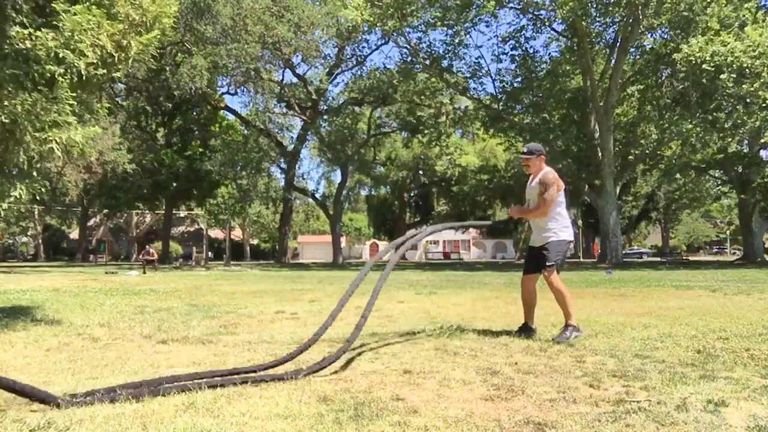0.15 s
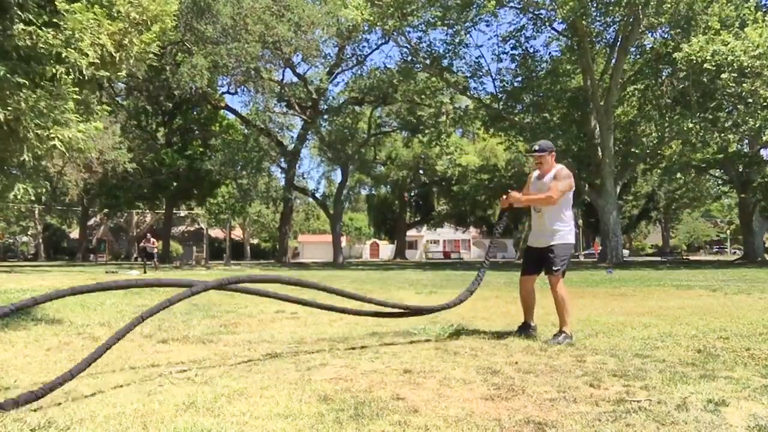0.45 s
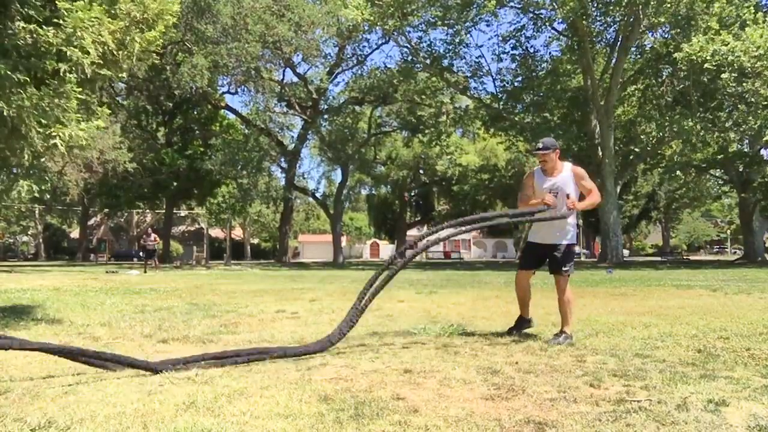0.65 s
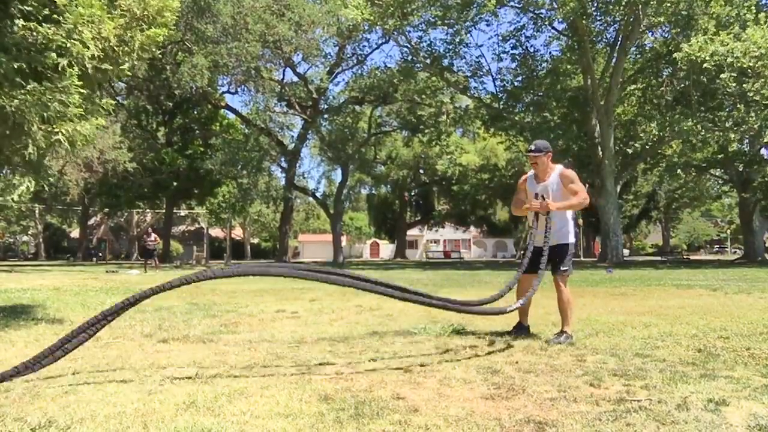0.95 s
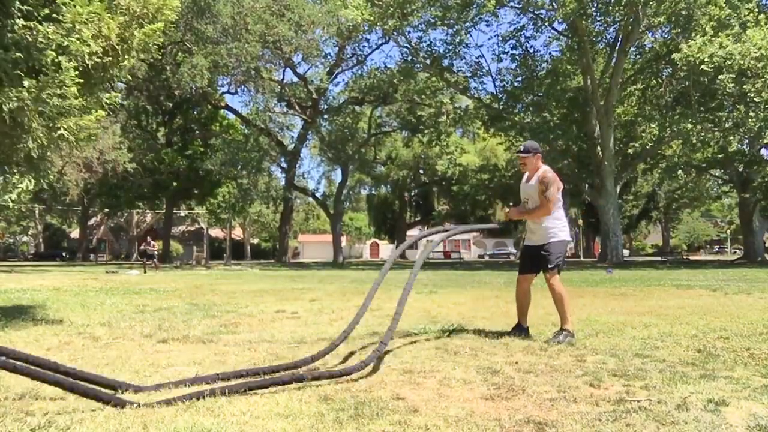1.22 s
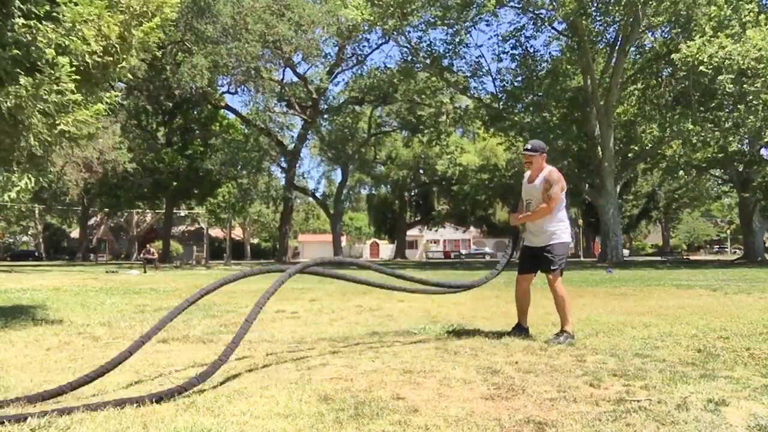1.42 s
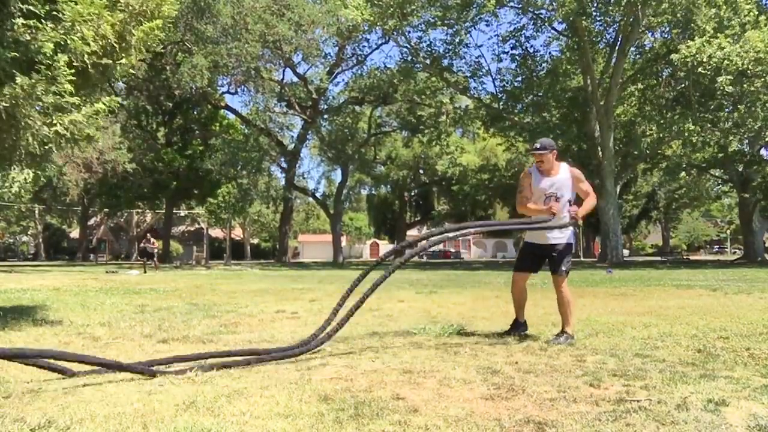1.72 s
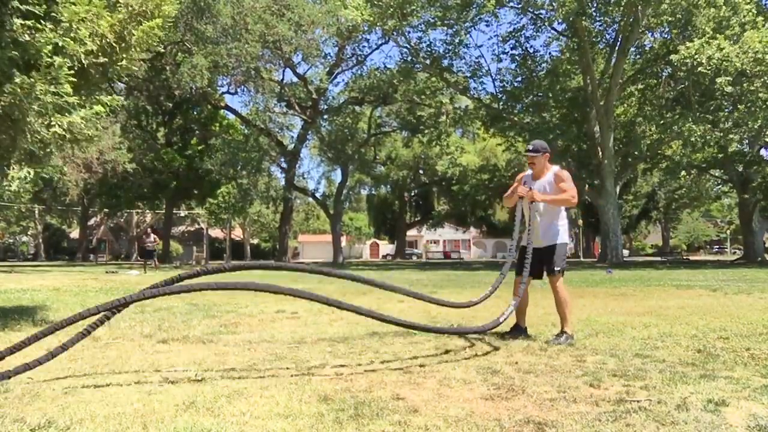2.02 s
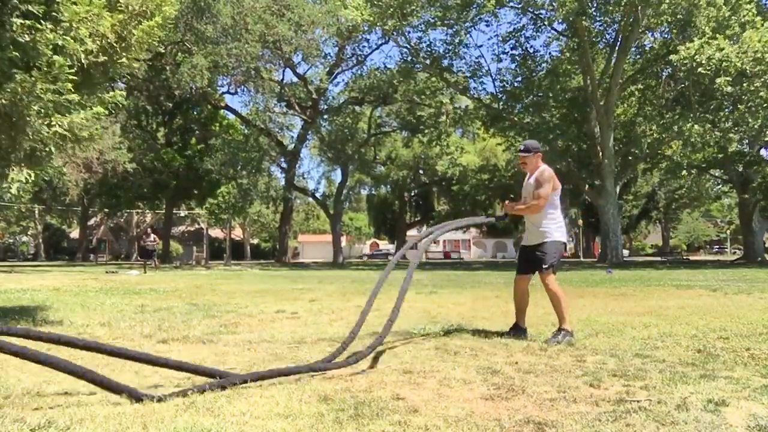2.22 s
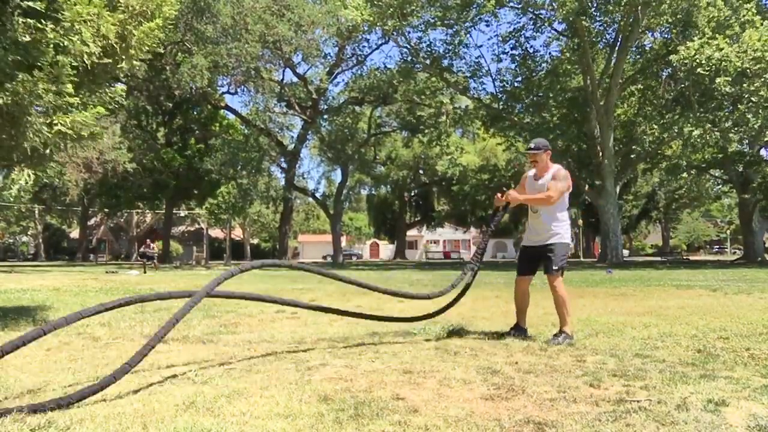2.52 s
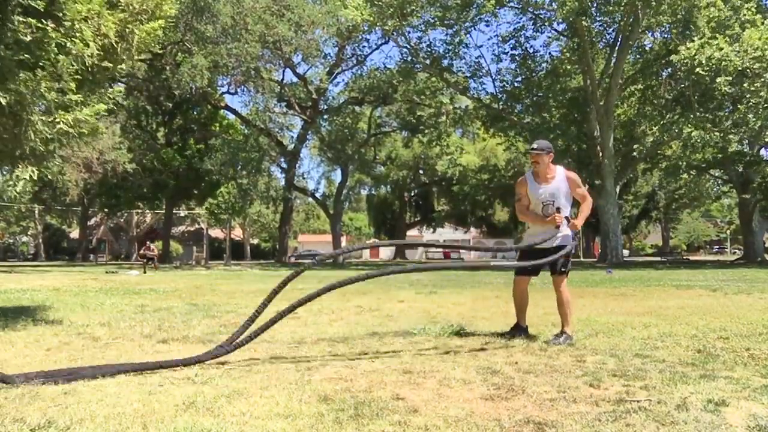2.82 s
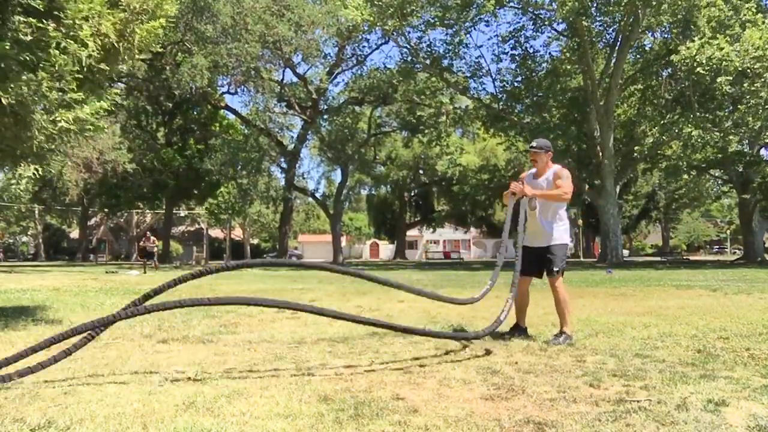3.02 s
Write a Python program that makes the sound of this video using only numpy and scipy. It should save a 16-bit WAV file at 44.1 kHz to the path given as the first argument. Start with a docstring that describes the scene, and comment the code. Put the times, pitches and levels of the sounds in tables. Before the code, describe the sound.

Battle ropes whipped in waves brush and thump on a park lawn amid gusty wind rumble

```python
"""A microphone stands by a dry lawn in a park, for about three seconds.
First come the park's steady hush (coloured noise), wind rumbling on the microphone (fluttering noise)
and faint distant birds (gliding tones). Two heavy exercise ropes, whipped in waves, swish through the
grass (crackling noise); eddies buffet the microphone (throbs under noise), most thickly from 0.5 to 1 s.
From 0.5 s the ropes slap the turf about twice a second (short cracks and thuds)."""
import sys
import numpy as np
from scipy import signal
from scipy.fft import rfft, irfft
from scipy.io import wavfile
from scipy.ndimage import uniform_filter1d

SR = 44100
rng = np.random.default_rng(int(sys.argv[2]) if len(sys.argv) > 2 else 0)


def int16_out(signal):
    """Quantize to a 16-bit WAV file."""
    q = np.round(np.clip(np.atleast_2d(signal).T, -1, 1) * 32767)
    wavfile.write(sys.argv[1], SR, q.astype(np.int16))


N = 138915
TIME = np.arange(N) / SR  # s
FREQS = np.maximum(np.arange(N + 1) * SR / (2 * N), 1)  # Hz, for a spectrum padded to twice the length


def from_db(db):
    """Decibels to amplitude gain."""
    return 10 ** (np.asarray(db) / 20)


def rms_one(x):
    """Scale to unit rms."""
    return x / np.sqrt(np.mean(x ** 2) + 1e-20)


def coloured(x, colour, tilt_db=0):
    """Shape a spectrum, tilted in dB per octave and falling away beyond both end points; rms 1."""
    hz, db = np.transpose(colour)
    gain = from_db(np.interp(np.log(FREQS), np.log(hz), db) + tilt_db * np.log2(FREQS))
    below = np.minimum(FREQS / hz[0], 1) ** 2
    above = np.minimum(hz[-1] / FREQS, 1) ** 2
    return rms_one(irfft(rfft(x, 2 * N) * gain * below * above)[:N])


def noise():
    """White noise."""
    return rng.standard_normal(N)


def drift(rate):
    """Random wander of spread about 1: straight lines between random values, at a rate per second."""
    knots = rng.standard_normal(1000)
    return np.interp(TIME * rate, np.arange(len(knots)), knots)


def evened(x, span_s):
    """Hold a noise at unit level over a short span."""
    power = uniform_filter1d(x ** 2, max(int(span_s * SR), 2))
    return x / np.sqrt(np.abs(power) + 1e-12)


def swell(s, rise_s, fall_s):
    """A rounded (Gaussian) rise and fall around a moment."""
    width_s = np.where(TIME < s, rise_s, fall_s)
    return np.exp(-.5 * ((TIME - s) / width_s) ** 2)


def blow(s, attack_s, decay_s):
    """A quick rise to a moment, then an exponential decay."""
    return np.exp(-np.where(TIME < s, ((TIME - s) / attack_s) ** 2, (TIME - s) / decay_s))


def crackle():
    """Dry blades snapping at random over a smooth rub."""
    snaps_per_s, spread_db, share = 5000, 6, 0.33  # share of the power that is snaps
    sizes = from_db(spread_db * np.minimum(rng.exponential(1, N), 5))
    signs = rng.choice([-1, 1], N)
    snaps = rms_one(sizes * signs * (rng.random(N) < snaps_per_s / SR))
    return np.sqrt(share) * snaps + np.sqrt(1 - share) * noise()


# spectrum of the park's hush: f/Hz, relative level/dB per Hz
PARK_SPECTRUM = [(60, 12), (200, -7), (450, -4.5), (800, -1.5), (1300, -2), (2000, -9.5), (3200, -14.5),
                 (4500, -18.5), (7500, -25), (9000, -25.5), (15500, -25)]
PARK_DB = -55.5


def park_hush():
    """The steady hush of the park behind everything: noise of fixed level and colour."""
    return from_db(PARK_DB) * coloured(noise(), PARK_SPECTRUM)


# strength of the breeze at the microphone: t/s, level/dB before trim and flutter
BREEZE = [(0, -47.5), (.07, -50), (.13, -44), (.46, -44), (.53, -38.5), (.57, -32), (0.622, -36),
          (.685, -42.5), (.705, -55), (.745, -42), (.775, -37.5), (.9, -34), (.99, -35.5), (1.12, -45),
          (1.2, -35), (1.245, -56), (1.3, -41), (1.37, -51.5), (1.42, -41), (1.56, -47.5), (1.68, -45),
          (1.92, -43.5), (2.04, -50.5), (2.12, -41.5), (2.21, -47), (2.38, -42), (2.56, -45), (2.66, -42),
          (2.86, -42), (3.15, -45.5)]
# spectrum of the wind rumble: f/Hz, relative level/dB per Hz
RUMBLE_SPECTRUM = [(22, -14), (35, -17.5), (55, 1.5), (80, 7), (125, 1.5), (185, -2.5), (260, -12),
                   (400, -27), (700, -36)]
WIND_TRIM_DB, WIND_FLUTTER_DB, WIND_FLUTTER_PER_S = -0.38, 2, 30.056


def wind():
    """A fluttering rumble on the microphone that follows the strength of the breeze."""
    s, db = np.transpose(BREEZE)
    level_db = np.interp(TIME, s, db) + WIND_TRIM_DB + WIND_FLUTTER_DB * drift(WIND_FLUTTER_PER_S)
    rumble = evened(coloured(noise(), RUMBLE_SPECTRUM), span_s=0.058)
    return from_db(level_db) * rumble


# distant bird notes: t/s, rise/s, fall/s, f/Hz at t, glide/Hz per s, level/dB before leaf flutter and echo
BIRD_NOTES = [(.04, 0.03, .03, 2850, 0, -64), (1.41, 0.008, .006, 3380, -9000, -63),
              (1.444, .006, .006, 3420, -6000, -65), (1.673, 0.0088, .01, 3450, -10000, -59),
              (1.762, .008, .012, 5200, -14000, -67.5), (1.847, 0.011, 0.0063, 3550, -13000, -61),
              (1.89, 0.0054, 0.0064, 3400, -3000, -63), (2.222, .012, .008, 3480, -12000, -60.5),
              (2.247, .005, .007, 3450, -9000, -64), (3.021, 0.0046, 0.0045, 5000, -320000, -55)]
NOTE_WAVER_HZ = 44.8
LEAF_FLUTTER = 0.54  # the notes flutter on their way through the leaves (0-1)
TREE_ECHO_DB, TREE_DECAY_S = -2, .06  # the notes scatter back from the trees


def birds():
    """Thin, mostly falling notes and one sharp chip, blurred by echoes from the trees."""
    notes, waver_hz = 0, NOTE_WAVER_HZ * drift(rate=100)
    for s, rise_s, fall_s, hz, glide, db in BIRD_NOTES:
        pitch_hz = hz + glide * (TIME - s) + waver_hz
        tone = np.sin(2 * np.pi * np.cumsum(pitch_hz) / SR)
        notes = notes + from_db(db) * swell(s, rise_s, fall_s) * tone
    notes = notes * rms_one(1 + LEAF_FLUTTER * drift(rate=160))
    trees = noise() * np.exp(-TIME / TREE_DECAY_S)
    trees = trees / np.sqrt(np.sum(trees ** 2))  # unit energy
    echoes = signal.fftconvolve(notes, trees)[:N]
    return notes + from_db(TREE_ECHO_DB) * echoes


# a rope sweeps through the grass: peak t/s, rise/s, fall/s, blade hiss level/dB, rope scuff level/dB,
# both levels before the tufts
SWEEPS = [(.16, 0.079, 0.049, -59.5, -59), (.375, 0.1, 0.063, -59.5, -54),
          (.495, 0.019, 0.011, -57.5, -49.5), (.74, 0.066, 0.089, -63, -60),
          (.925, 0.029, 0.051, -63.5, -59), (1.31, 0.078, 0.036, -59, -52), (1.509, 0.093, 0.023, -59, -55),
          (1.62, 0.068, 0.033, -62, -56.5), (1.785, 0.045, 0.11, -62, -55.5),
          (1.98, 0.036, 0.05, -62, -56.5), (2.10, 0.026, 0.033, -63, -60), (2.26, 0.04, 0.057, -61.5, -53),
          (2.37, 0.033, 0.1, -59.5, -53), (2.565, 0.05, 0.018, -62, -52.5),
          (2.60, 0.0082, 0.017, -64, -63.5), (2.735, 0.02, 0.01, -72, -55.5),
          (2.81, 0.051, 0.086, -61.5, -55), (3.03, 0.055, 0.17, -65, -56.5)]
# spectrum of the blade hiss: f/Hz, relative level/dB per Hz
HISS_SPECTRUM = [(1500, -38), (3000, -1.5), (5000, -1.5), (6500, -1.5), (7500, -8), (8700, -1.5),
                 (10000, -4), (11200, -3), (12500, -4), (15300, 1.6)]
# spectrum of the rope scuff: f/Hz, relative level/dB per Hz
SCUFF_SPECTRUM = [(250, 8), (600, 1.5), (1300, 0.5), (2000, -7), (2700, -7), (4200, -20), (8000, -21)]
TUFTS_PER_S, TUFT_DB = 70, 1  # the rope meets the grass tuft by tuft


def swishes():
    """The travelling waves brush the blades, tuft by tuft, and scuff the turf."""
    hiss_level = sum(from_db(db) * swell(s, rise, fall) for s, rise, fall, db, _ in SWEEPS)
    scuff_level = sum(from_db(db) * swell(s, rise, fall) for s, rise, fall, _, db in SWEEPS)
    tufts = from_db(TUFT_DB * drift(TUFTS_PER_S))
    hiss = hiss_level * coloured(crackle(), HISS_SPECTRUM)
    scuff = scuff_level * coloured(crackle(), SCUFF_SPECTRUM)
    return tufts * (hiss + scuff)


# eddies at the microphone: t/s, half length/s, flutter level/dB, upper edge f/Hz,
# throb f/Hz before its waver, throb level/dB
EDDIES = [(0.219, 0.0044, -43, 258, 110, -41.5), (0.29, 0.0071, -42.5, 397, 150, -37),
          (0.498, 0.0061, -34.5, 455, 105, -32.5), (0.52, 0.0037, -30, 705, 195.3, -23.5),
          (0.549, 0.016, -44.5, 476, 125, -30), (0.597, 0.0028, -24, 583, 112, -21),
          (0.613, 0.0022, -29, 460, 160, -26), (0.63, 0.0053, -35, 338, 165, -27.5),
          (0.679, 0.011, -58, 250, 105, -40), (0.77, 0.0021, -36, 740, 135, -30),
          (0.788, 0.004, -37, 730, 135, -32), (0.814, 0.011, -44, 626, 140, -31.5),
          (.831, 0.0022, -29, 1000, 200, -42), (0.841, 0.0042, -26, 795, 120, -25.5),
          (0.856, 0.0045, -29, 676, 220, -29.5), (0.8724, 0.0027, -31, 760, 90, -33),
          (0.8824, 0.0021, -24, 700, 167, -33), (0.901, 0.0066, -35, 495, 185.6, -38.5),
          (0.934, 0.0035, -36, 680, 215, -35), (0.95, 0.0056, -30.5, 607, 207, -28.5),
          (0.96, 0.0049, -52, 403, 105, -25), (0.968, 0.0046, -33, 710, 125, -42),
          (1.05, 0.0027, -34.5, 584, 180, -31), (1.075, 0.01, -40, 340, 210.3, -41.5),
          (1.108, 0.016, -48.5, 300, 185, -40), (1.178, 0.0098, -39, 375, 184, -41),
          (1.205, 0.007, -38.5, 375, 175.6, -36.5), (1.278, 0.011, -44.5, 330, 150, -32.5),
          (1.595, 0.0086, -44.5, 357, 130, -41), (1.682, 0.0023, -44, 183, 90, -37.5),
          (1.782, 0.0078, -44, 334, 130, -40.5), (2.075, 0.0088, -41, 234, 125, -39.5),
          (2.313, 0.011, -48, 285, 177.6, -37.5), (2.397, 0.0049, -45, 222, 105, -37.5)]
# spectrum of the flutter before its upper edge: f/Hz, relative level/dB per Hz
FLUTTER_SPECTRUM = [(130, -1.5), (200, 3.5), (265, 3.5), (340, -0.5), (430, -0.5), (520, -.5), (630, -1),
                    (760, -9.5), (1000, -11), (1400, -12)]
THROB_SPREAD_S, THROB_WAVER = 0.0038, 0.1789  # the throb outlasts the flutter; share its pitch wanders by


def buffets():
    """Each eddy is a low throb at its own pitch under a short flutter with its own upper edge."""
    air, waver, out = coloured(noise(), FLUTTER_SPECTRUM), 1 + THROB_WAVER * drift(rate=90), 0
    for s, half_s, db, edge_hz, throb_hz, throb_db in EDDIES:
        puff = signal.sosfilt(signal.butter(6, edge_hz, fs=SR, output="sos"), air)
        flutter = evened(puff, span_s=0.00866)
        out = out + from_db(db) * swell(s, half_s, half_s) * flutter
        cycles = throb_hz * np.cumsum(waver) / SR + rng.random()  # random starting phase
        throb = rms_one(np.sin(2 * np.pi * cycles))
        width_s = np.hypot(half_s, THROB_SPREAD_S)
        out = out + from_db(throb_db) * swell(s, width_s, width_s) * throb
    return out


# a rope lands: t/s, crack level/dB, attack/s, decay/s, brightness/dB per octave, thud level/dB
LANDINGS = [(0.487, -52.5, 0.0047, 0.028, 1, -55), (1.032, -53.5, 0.011, 0.009, 1.5, -42),
            (1.062, -55, .004, 0.011, 0.5, -40), (1.637, -44.5, 0.0046, 0.0073, 0, -37.5),
            (2.102, -54, 0.0027, 0.0097, -1, -46), (2.121, -46.5, 0.0043, 0.012, -2, -49.5),
            (2.245, -52.5, 0.0037, 0.0075, 1.5, -41.5), (2.557, -47.5, 0.011, 0.0071, -3.5, -41),
            (2.571, -48.5, 0.0023, 0.0027, 1, -43), (2.6323, -38.5, 0.0021, 0.0037, 1.2, -37),
            (2.649, -37.5, 0.0017, 0.0034, -1, -36), (3.106, -50.5, 0.0046, 0.004, 3, -59),
            (3.128, -48, .005, 0.004, 1.5, -45)]
# spectrum of the crushed grass before the brightness tilt: f/Hz, relative level/dB per Hz
CRUSH_SPECTRUM = [(300, 22.5), (700, 13.5), (1300, 17), (2600, 10.5), (4500, 4), (8000, 1.5), (15500, -6)]
# spectrum of the thud on the soil: f/Hz, relative level/dB per Hz
THUD_SPECTRUM = [(50, 7), (110, 17), (250, 5.5), (450, 2), (900, -18.5)]
THUD_ATTACK_S, THUD_DECAY_S, THUD_LAG_S = 0.0045, 0.0049, 0.0048
# grass rustling around each landing, level relative to the crack
SETTLE_DB, SETTLE_RISE_S, SETTLE_FALL_S = -24, 0.011, 0.025


def slaps():
    """Each landing crushes grass in a short crack and thuds on the soil."""
    grass, out = crackle(), 0
    soil = evened(coloured(noise(), THUD_SPECTRUM), span_s=0.0071)
    for s, db, attack_s, decay_s, tilt_db, thud_db in LANDINGS:
        rustle = from_db(SETTLE_DB) * swell(s, SETTLE_RISE_S, SETTLE_FALL_S)
        crush = np.hypot(blow(s, attack_s, decay_s), rustle)
        out = out + from_db(db) * crush * coloured(grass, CRUSH_SPECTRUM, tilt_db)
        thud = blow(s + THUD_LAG_S, THUD_ATTACK_S, THUD_DECAY_S) * soil
        out = out + from_db(thud_db) * thud
    return out


def scene():
    """Park, wind, birds and ropes at one microphone."""
    return (park_hush() + wind() + birds() + swishes() + buffets() + slaps())[None]


MIC_LOW_CUT_HZ, CUTOFF_HZ = 31.3, 15850


def record(dry):
    """The microphone sheds the deepest bass; the top is cut steeply."""
    thin = signal.sosfilt(signal.butter(3, MIC_LOW_CUT_HZ, "high", fs=SR, output="sos"), dry)
    return signal.sosfilt(signal.ellip(12, .1, 80, CUTOFF_HZ, fs=SR, output="sos"), thin)


dry = scene()
out = record(dry)
int16_out(out)
```